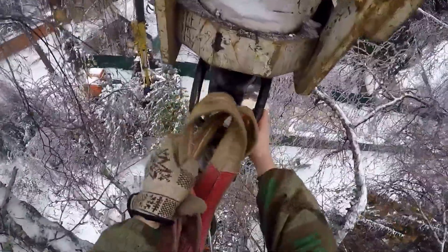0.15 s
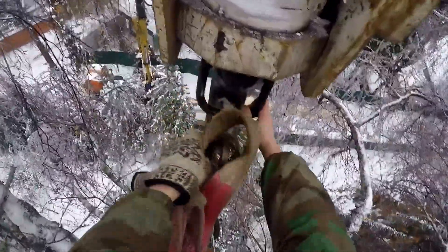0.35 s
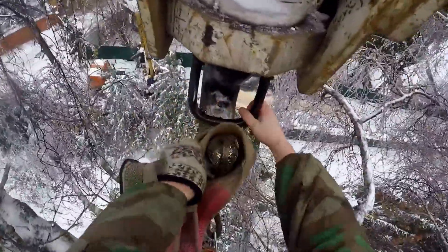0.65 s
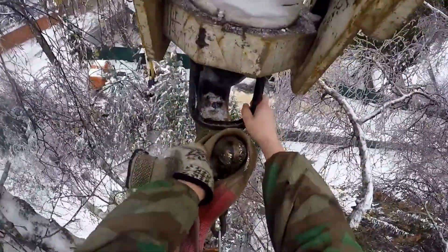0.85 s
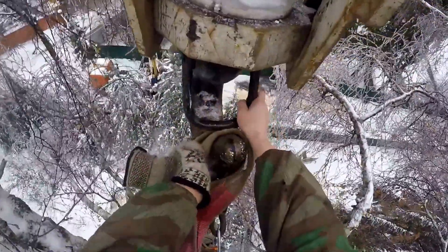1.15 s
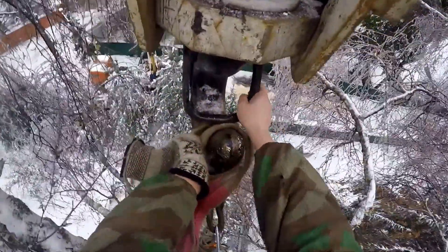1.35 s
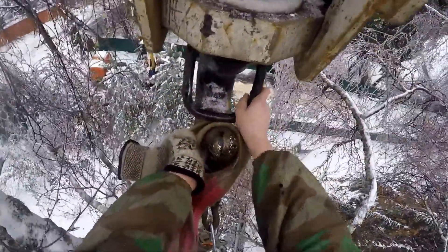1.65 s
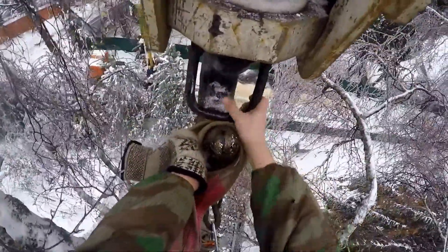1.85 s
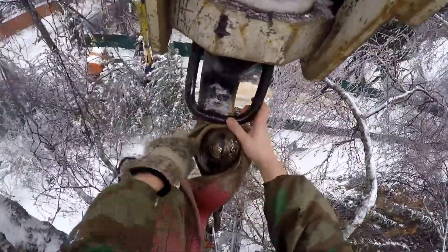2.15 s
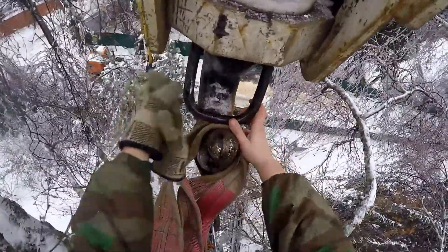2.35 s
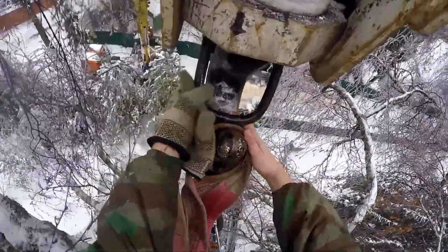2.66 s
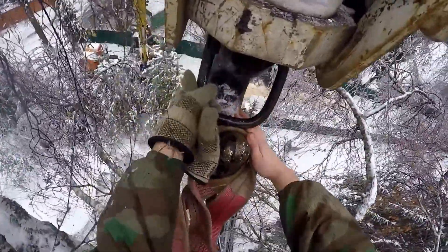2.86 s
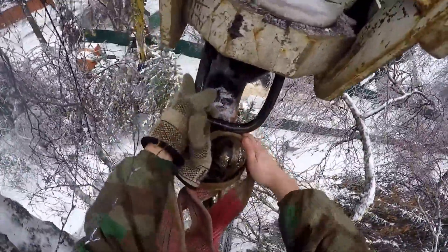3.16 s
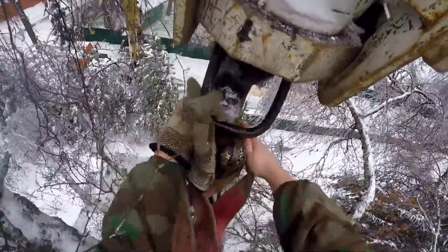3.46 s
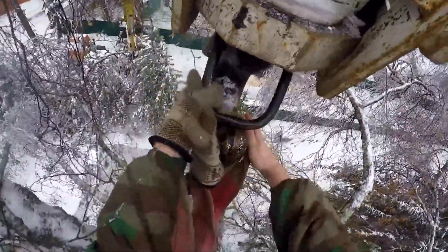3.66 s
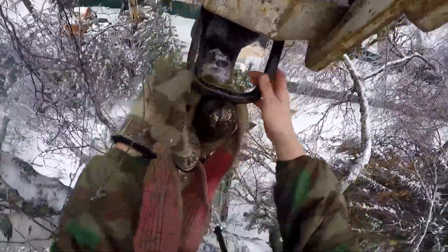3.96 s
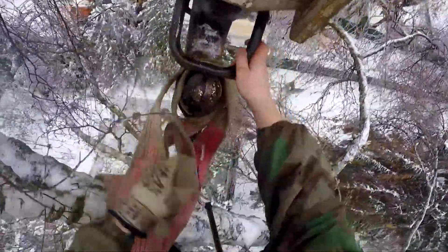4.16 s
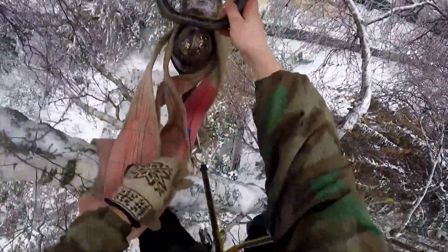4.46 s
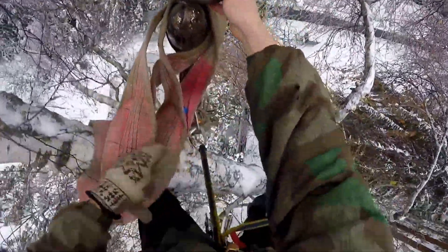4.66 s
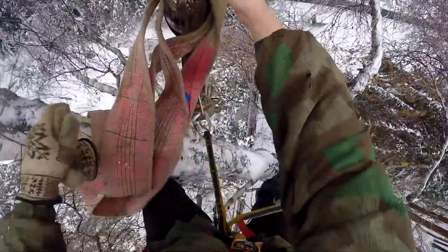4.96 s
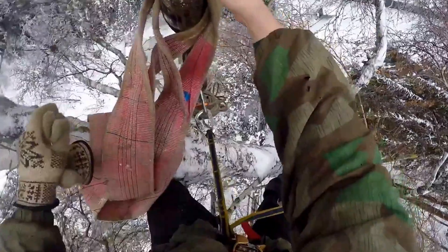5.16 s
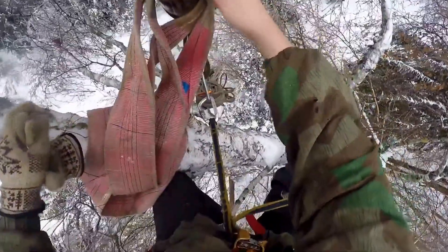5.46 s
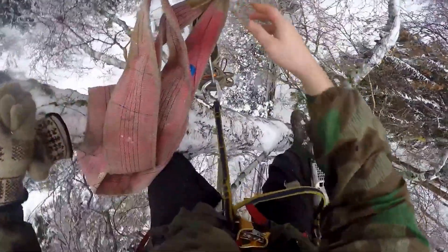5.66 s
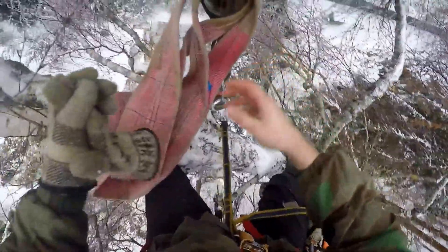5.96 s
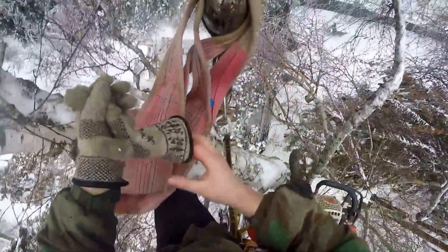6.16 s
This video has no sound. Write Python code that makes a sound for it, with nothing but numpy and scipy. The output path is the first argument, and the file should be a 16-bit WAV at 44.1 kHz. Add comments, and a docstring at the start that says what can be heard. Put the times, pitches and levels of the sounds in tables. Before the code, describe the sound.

After faint ticks and dull glove knocks, one loud bright metal clang rings out, followed by two weaker clinks over low wind and faint engine hum.

```python
"""High in a snowy tree, close to the microphone, a steel handle swings three times against a heavy crane hook,
each blow softer: decaying modes under a dense clatter, with a thin tail off the trunks and crane. Light taps
wake single handle modes as short rings and gloves knock dully as low rings in rough noise. Far below a diesel
idles, noise puffs through panel resonances; wind noise rumbles on the microphone in gusts and surges. The
camera adds its own shaped hiss and a thin whine gated to a buzz."""
import sys
import numpy as np
from scipy import signal
from scipy.fft import rfft, irfft
from scipy.io import wavfile
from scipy.ndimage import uniform_filter1d

SR = 44100
rng = np.random.default_rng(int(sys.argv[2]) if len(sys.argv) > 2 else 0)


def boost(x):
    """Linear amplitude factor 10**(x/20) for a level x in decibels (scalar or array-like)."""
    u = np.asarray(x, float) / 20
    return 10 ** u


def to_wav(sig):
    """Store sig (one row per channel, or 1-D mono) as 16-bit WAV at the path in sys.argv[1].

    Samples outside -1..1 are clipped; the rate is SR.
    """
    pcm = np.clip(np.atleast_2d(sig), -1, 1) * 32767
    pcm = np.round(pcm).astype(np.int16)
    wavfile.write(sys.argv[1], SR, pcm.T)  # frames by channels


N = 278264
T = np.arange(N) / SR

# Blows of the handle on the hook:
# (time [s], level [dB], sideways modes [dB], highest pitch the contact reaches [Hz], push [s])
BLOWS = [(3.578, 1, -1.5, 20000, .002), (4.012, -8, -13, 19800, 0.0073),
         (4.446, -16.5, -10.5, 3010, .00079)]
# What follows each blow: (delay of the second contact, which wakes the treble [s], free ring [s],
# t60 once the hand closes [s], share of the twin mode [ratio, negative if opposed], hook t60 [s])
AFTER_BLOW = [(0.0055, 0.057, 0.62, -1, .17), (0.012, .1, 0.3, -0.0057, 0.97),
              (.011, 0.1, 0.44, 0.29, 0.56)]
# Pitches of the handle modes: (pitch [Hz])
HANDLE_HZ = [1010, 1184, 1588, 1803, 1908, 2345, 2471, 2697, 3140, 3402, 3553, 3849, 3984, 4196, 4592, 4969,
             5125, 5665, 5820, 6462, 6837, 7135, 7615, 8630, 8760, 9437, 10070, 10310, 11880, 13010, 14380]
# The same modes, before the treble is lengthened: (t60 [s], level in a full blow [dB])
HANDLE_RING = [(0.3, -35.5), (.73, -42.5), (0.17, -31.5), (0.29, -26.5), (0.97, -27.5), (.095, -39.5),
               (.22, -30.5), (.6, -14.5), (.2, -46), (0.34, -8), (.24, -43.5), (0.73, -33), (0.28, -37),
               (0.29, -35.5), (0.27, -20), (0.24, -28), (.18, -38), (.061, -20), (.32, -45), (0.2, -24.5),
               (.086, -23.5), (0.16, -29.5), (0.41, -30.5), (.3, -41), (0.184, -34), (0.12, -23),
               (.14, -25.5), (0.17, -35.5), (0.3, -38), (.25, -35.5), (.14, -36.5)]
# Body modes of the hook: (pitch [Hz], level in a full blow [dB])
HOOK = [(227, -49.5), (579, -34), (1220, -47.5)]
# Modes that a slanting blow favours: (pitch [Hz])
SIDEWAYS_HZ = [227, 579, 1184, 1588, 1803, 3140, 3984, 4196, 4592, 6462, 7615, 9437, 10070, 10310, 14380]
# Modes that a slanting blow mostly misses: (pitch [Hz])
HEAD_ON_HZ = [1220, 2471, 3849, 4969, 5125]
# Light taps that wake one mode of the handle: (time [s], pitch [Hz], level [dB], t60 [s])
TAPS = [(.195, 4950, -51.5, .05), (.254, 4940, -52, .05), (.368, 4592, -47.5, 0.083),
        (0.373, 2480, -49, .1), (.379, 3370, -49.5, 0.2), (4.458, 4969, -46, 0.066)]
# Metal contacts that set off the clatter:
# (time [s], rms level of the modes [dB], brightness [dB per octave], t60 [s])
CONTACTS = [(.195, -49, -14, .06), (.234, -50, -6, .05), (.254, -48, -11, .089), (0.306, -49, -9, .1),
            (.369, -43.5, -3, 0.038), (.377, -44, 1, .088), (1.873, -49.5, -14.5, 0.37),
            (3.534, -42.5, -6, .05), (3.579, -3.5, -7, 0.049), (3.585, -15, -0.1, 0.28),
            (3.750, -46, -3, 0.2), (3.775, -46.5, -6, .19), (4.011, -20, -8, 0.065), (4.027, -28, 0, .21),
            (4.341, -47, 7, .023), (4.446, -32, -6.5, 0.12), (4.458, -47, 0, 0.1),
            (4.539, -42.5, -11, 0.27)]
# Relative colour of the clatter: (pitch [Hz], level [dB per Hz])
CLATTER_COLOUR = [(150, -67), (600, -27.5), (1200, -18), (2100, -4.5), (2900, 8.5), (4200, 0), (6500, -1),
                  (10000, -9.5), (15500, -18.5)]
# Dull knocks of glove and sling: (time [s], peak level [dB], pitch [Hz])
KNOCKS = [(0.551, -40, 920), (1.671, -44, 1150), (1.894, -43.5, 1250), (2.764, -36.5, 1224),
          (3.127, -43.5, 1310), (3.167, -40, 1190), (3.415, -42, 1210)]
# Diesel panel resonances as heard from afar: (pitch [Hz], width [Hz], relative level [dB])
DIESEL_PANELS = [(1005, 97, -5.5), (1090, 110, -2.5), (1183, 25.7, 2.5), (1309, 33, 3.5), (1839.5, 40, 2.5),
                 (1944, 30, 0.5), (2340, 144, -3), (2465, 100, -1), (2883, 278, -1), (3425, 110, -6),
                 (3550, 74, -5.5), (4460, 370, -15.5)]
# Loudness of the panels: (time [s], level [dB])
DIESEL_LEVEL = [(0, -56), (2, -56), (4, -55), (5.5, -55.5), (6.31, -53.5)]
# Firing strength of each of the eight cylinders, before scatter: (relative level [dB])
CYLINDERS = [-7, 0.2, -6.5, 3.5, -2.5, 1.7, 2, -8.5]
# Gusts, before the surges: (time [s], level [dB])
GUSTS = [(0.0, -32.5), (0.14, -41.5), (0.67, -37), (1.0, -45.5), (1.6, -37), (2.71, -45), (2.78, -37.5),
         (3.18, -33.5), (3.32, -30), (3.48, -41), (4.02, -35), (5.11, -51), (5.8, -41.5), (6.31, -49.5)]
# Relative colour of the wind: (pitch [Hz], level [dB per Hz])
WIND_COLOUR = [(5.9, -35.5), (10, 3), (35, -2.5), (51, -9.5), (70, -17.5), (103, -23.5), (182, -52.5),
               (260, -45), (340, -79.5), (570, -120)]
# Relative colour of the camera hiss: (pitch [Hz], level [dB per Hz])
HISS_COLOUR = [(100, 0), (300, -4), (600, -8), (1500, -1), (2200, -7), (4000, -12.5), (7000, -17),
               (11000, -21), (15500, -22.5)]
# Dips of the camera housing: (pitch [Hz], width [Hz], gain [dB])
HOUSING_DIPS = [(1667, 160, -5.5), (2187, 174, -7.5), (3070, 230, -7.5), (3723, 360, -14)]

TREBLE_HZ, TREBLE_LONGER = 6000, 1.1  # modes above this pitch ring longer by this ratio
HEAD_ON_GAIN = 0.73  # dB won head-on per dB lost sideways
SOFT_CUT_DB = -21  # loss above a soft contact's reach
TWIN_HZ, TWIN_SPLIT_HZ, TWIN_T60_S = 2697, 4.73, 0.28
GRIP_SLOPE = 0.55  # the hand's loss grows as pitch to this power
KNOCK_T60_S = 0.032
FIRING_HZ = 46.3  # mean rate, all cylinders together
FRAME_HZ = 59.94
TOP_HZ = 15350  # upper limit of the clatter's random modes and of the microphone


def curve(rows):
    """Straight lines between (time [s], value) rows."""
    return np.interp(T, *np.transpose(rows))


def unit(x):
    """Scale to rms 1."""
    return x / np.sqrt(np.mean(x ** 2))


def coloured(rows, count, tilt_db=0.):
    """Noise of rms 1 with a (pitch [Hz], level [dB]) spectrum, tilted per octave about 3 kHz."""
    octave = np.log2(np.fft.rfftfreq(count, 1 / SR) + 1)
    hz, db = np.transpose(rows)
    shape_db = np.interp(octave, np.log2(hz), db) + tilt_db * (octave - np.log2(3000))
    spectrum = rfft(rng.standard_normal(count)) * boost(shape_db)
    return unit(irfft(spectrum, count))


def band(x, hz, width):
    """A resonance applied twice, so the valleys stay dark."""
    b, a = signal.iirpeak(hz, hz / width, SR)
    return signal.lfilter(b, a, signal.lfilter(b, a, x))


def walk(rate):
    """Random levels of rms 1, held 1 / rate s and slewed twice."""
    hold = int(SR / rate)
    steps = np.repeat(rng.standard_normal(N // hold + 1), hold)
    slewed = uniform_filter1d(uniform_filter1d(steps, hold), hold)
    return unit(slewed[:N])


def add(out, start, x):
    """Mix x in from the time start."""
    i = int(start * SR)
    out[i:i + len(x)] += x[:N - i]


def ring(hz, db, t60, rise=0.00062):
    """One second of a decaying mode; the push takes a moment."""
    t = T[:SR]
    envelope = boost(db - 60 * t / t60) * (1 - np.exp(-t / rise))
    return envelope * np.sin(2 * np.pi * hz * t)


def blows():
    """Each blow rings handle and hook by its strength, slant and softness; a split pair beats slowly."""
    out, loss_db = np.zeros(N), grip()
    for (s, *blow, push), (second, _, _, twin, hook_t60) in zip(BLOWS, AFTER_BLOW):
        for m, (hz, (t60, full_db)) in enumerate(zip(HANDLE_HZ, HANDLE_RING)):
            start = s
            if hz > TREBLE_HZ:
                start, t60 = s + second, t60 * TREBLE_LONGER
            db = full_db + share_db(hz, *blow)
            mode = ring(hz, db, t60, push)
            if abs(hz - TWIN_HZ) < 99:
                mode = mode + twin * ring(hz + TWIN_SPLIT_HZ, db, TWIN_T60_S, push)
            # neighbouring modes start in opposite directions
            mode = (-1) ** m * mode
            hand = held(loss_db, start, count=SR) ** ((hz / 3000) ** GRIP_SLOPE)
            add(out, start, mode * hand)
        for hz, full_db in HOOK:
            add(out, s, ring(hz, full_db + share_db(hz, *blow), hook_t60, rise=0.0057))
    return out


def share_db(hz, db, sideways_db, reach_hz):
    """How much of a blow goes into one mode, by the way it bends and by how high the contact reaches."""
    def among(modes):
        """Whether the mode lies within 15 Hz of one listed."""
        return min(abs(hz - f) for f in modes) < 15

    slant = among(SIDEWAYS_HZ) - HEAD_ON_GAIN * among(HEAD_ON_HZ)
    beyond = 1 / (1 + (reach_hz / hz) ** 24)
    return db + sideways_db * slant + SOFT_CUT_DB * beyond


def grip():
    """Running loss in dB from a hand that lets the handle ring a moment after each blow, then closes a while."""
    rate_db = np.zeros(N)  # dB per second
    for (s, *_), (_, free, t60, _, _) in zip(BLOWS, AFTER_BLOW):
        closed = (T > s + free) & (T < s + free + .25)
        rate_db += 60 / t60 * closed
    return -np.cumsum(rate_db) / SR


def held(loss_db, s, count):
    """Gain the hand leaves to something that starts ringing at s."""
    db = loss_db[int(s * SR):][:count]
    return boost(db - db[0])


def clatter():
    """Hundreds of small modes, the handle's among them, newly shared out at each contact, over scrape noise."""
    out, loss_db = np.zeros(N), grip()
    t = T[:SR // 3]
    hz = np.append(rng.uniform(1100, TOP_HZ, size=220), HANDLE_HZ)
    phase, fade = rng.random((2, len(hz), 1))
    # each mode has its own extra decay, up to 150 dB per second
    bank = np.sin(2 * np.pi * (hz[:, None] * t + phase)) * boost(-150 * fade * t)
    colour_hz, colour = np.transpose(CLATTER_COLOUR)
    colour_db = np.interp(np.log(hz), np.log(colour_hz), colour)
    colour_db[-len(HANDLE_HZ):] += 4.  # the handle's modes stand out
    for s, db, tilt_db, t60 in CONTACTS:
        scatter_db = 3. * rng.standard_normal(len(hz))
        share = boost(colour_db + tilt_db * np.log2(hz / 3000) + scatter_db)
        modes = share @ bank / np.sqrt(np.sum(share ** 2) / 2)
        scrape = 0.393 * coloured(CLATTER_COLOUR, len(t), tilt_db)
        envelope = boost(db - 60 * t / t60) * (1 - np.exp(-t / 0.00127))
        # small modes feel the hand more
        hand = held(loss_db, s, count=len(t)) ** 2.1
        add(out, s, (modes + scrape) * envelope * hand)
    return out


def light_taps():
    """Each light tap wakes one mode of the handle as a short decaying ring."""
    out = np.zeros(N)
    for s, hz, db, t60 in TAPS:
        add(out, s, ring(hz, db, t60))
    return out


def trees(x):
    """Trunks and the crane scatter the metal back: a dull, thin tail."""
    t = T[:SR]
    colour = [(300, -20.5), (1000, 4), (4000, -11.5), (9000, -21.0)]  # (pitch [Hz], level [dB])
    decay = boost(-64.5 - 60 * t / 0.85)
    tail = coloured(colour, SR) * decay * (t > .02)  # nothing returns in the first 20 ms
    return signal.fftconvolve(x, tail)[:N]


def knocks():
    """Soft contacts of glove and sling: a low short ring with some rough noise around it."""
    out = np.zeros(N)
    for s, db, hz in KNOCKS:
        noise = unit(band(rng.standard_normal(SR), hz * 0.86, 1130.0))
        rough = noise * boost(db - 7.0 - 60 * T[:SR] / (2.14 * KNOCK_T60_S))
        add(out, s, ring(hz, db, KNOCK_T60_S) + rough)
    return out


def diesel():
    """Each firing shakes the panels with a puff of noise; the eight cylinders differ, so it lopes."""
    cycle = np.cumsum(FIRING_HZ * (1 + 0.0053 * walk(1.5))) / SR
    firing = cycle.astype(int)
    scatter_db = 2.2 * rng.standard_normal(N // 500)[firing]  # per firing
    strength = boost(np.array(CYLINDERS)[firing % 8] + scatter_db)
    puffs = 1.08 + strength * np.exp(-(cycle % 1) / 0.3)
    drive = uniform_filter1d(puffs, 60) * rng.standard_normal(N)
    panels = np.zeros(N)
    for hz, width, db in DIESEL_PANELS:
        # each pass is wider, as two passes narrow the resonance
        panels += boost(db + 1.6 * walk(4.03)) * band(drive, hz, 1.56 * width)
    exhaust = unit(band(rng.standard_normal(N), 91.5, 28.4)) * boost(-61.5 + 0.97 * walk(7.2))
    return unit(panels) * boost(curve(DIESEL_LEVEL)) + exhaust


def wind():
    """Slow pressure swings on the microphone; gusts lift the deepest part most, and it buffets in surges."""
    air = coloured(WIND_COLOUR, N)
    deep = signal.sosfiltfilt(signal.butter(2, 55, fs=SR, output="sos"), air)
    gust_db = curve(GUSTS)
    rest_db = -41.0 + .3 * (gust_db + 43.5)
    surge_db = 3. * walk(5)
    return (deep * boost(gust_db) + (air - deep) * boost(rest_db)) * boost(surge_db)


def camera():
    """Broad hiss, and a thin whine that is switched on afresh for part of every frame."""
    frame = T * FRAME_HZ + 0.42
    on = uniform_filter1d((frame % 1 < .44).astype(float), 30)
    phase, detune = rng.random((N // 500, 2))[frame.astype(int)].T  # per frame
    whine_hz = 8560 + 30 * (detune - .5)
    whine = np.sin(2 * np.pi * (whine_hz * T + phase))
    return coloured(HISS_COLOUR, N) * boost(-61) + whine * on * boost(-69.5)


def housing(x):
    """Narrow dips that everything outside the camera passes through."""
    for hz, width, db in HOUSING_DIPS:
        resonance = signal.lfilter(*signal.iirpeak(hz, hz / width, SR), x)
        x = x - (1 - boost(db)) * resonance
    return x


def scene():
    """All sources, near and far, in one channel."""
    metal = blows() + light_taps() + clatter()
    outside = metal + trees(metal) + knocks() + diesel() + wind()
    return (housing(outside) + camera())[None]


def band_limit(x):
    """A steep low-pass at the top of the band."""
    return signal.sosfilt(signal.butter(12, 16510, fs=SR, output="sos"), x)


def record(dry):
    """The microphone rounds the loudest peak and cuts the top."""
    rounded = np.tanh(.6 * dry) / .6
    top_cut = signal.ellip(8, .2, 60, TOP_HZ, fs=SR, output="sos")
    mix = signal.sosfilt(top_cut, rounded)
    return band_limit(mix)


dry = scene()
out = record(dry)
to_wav(out)
```